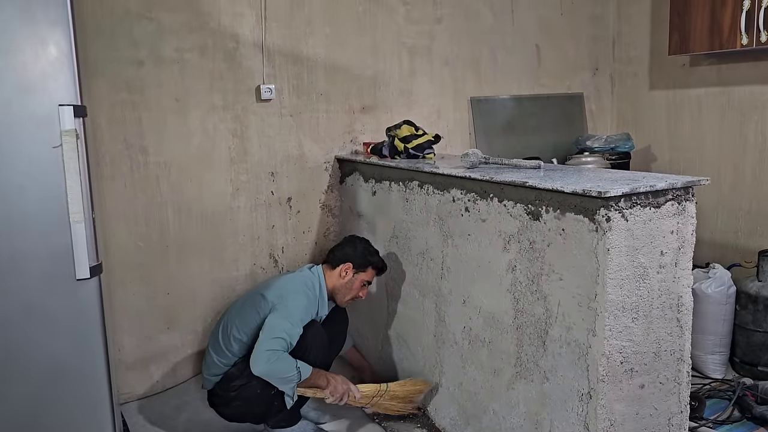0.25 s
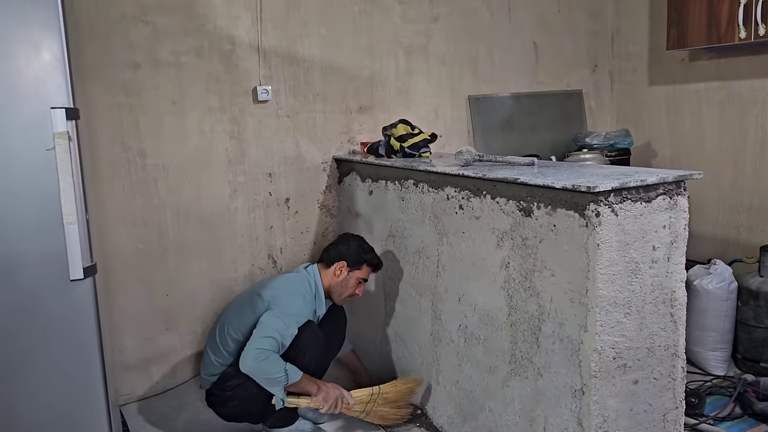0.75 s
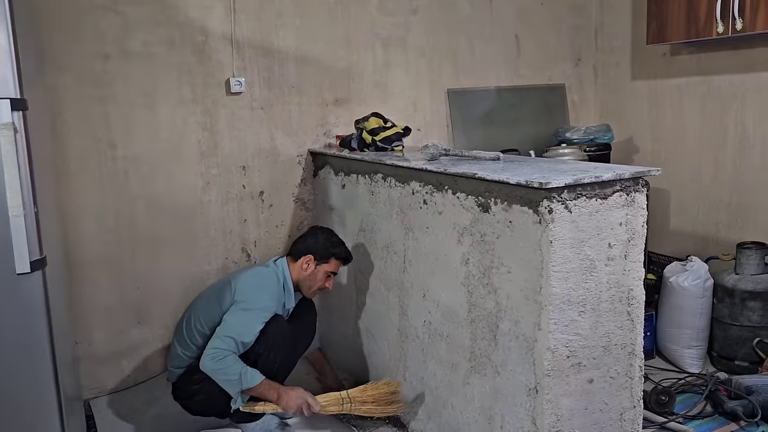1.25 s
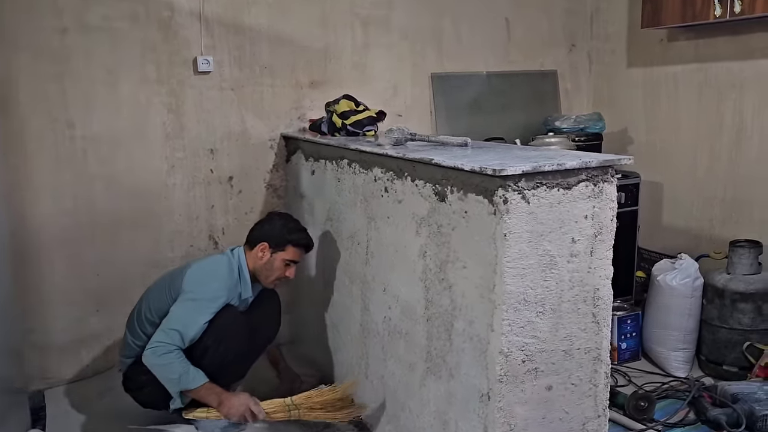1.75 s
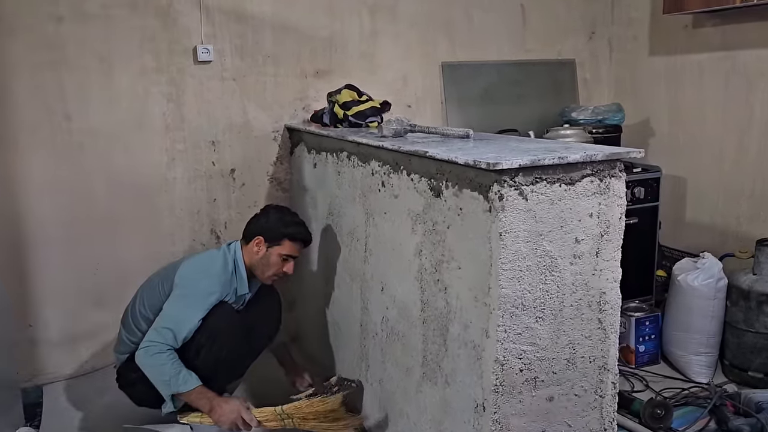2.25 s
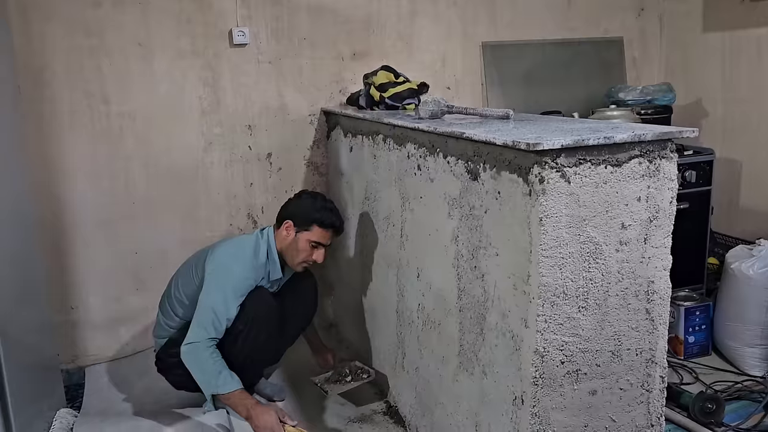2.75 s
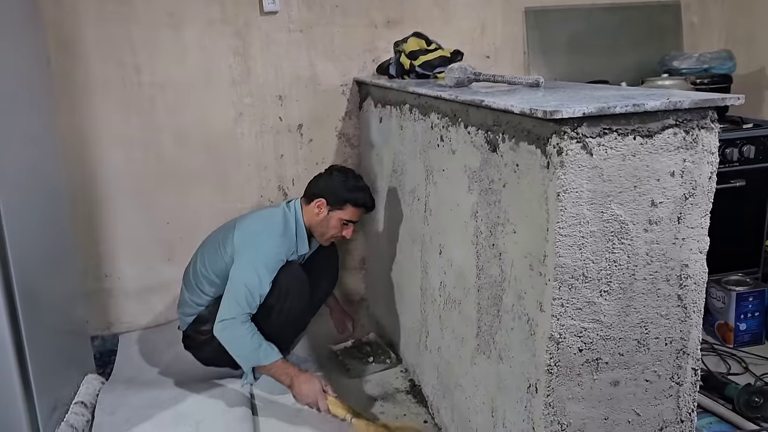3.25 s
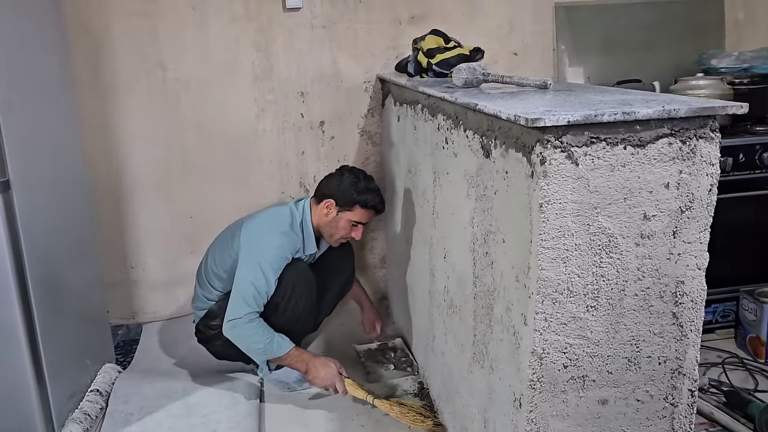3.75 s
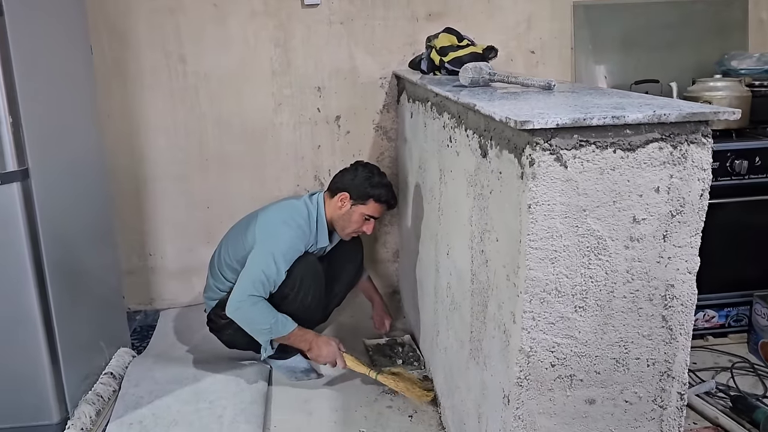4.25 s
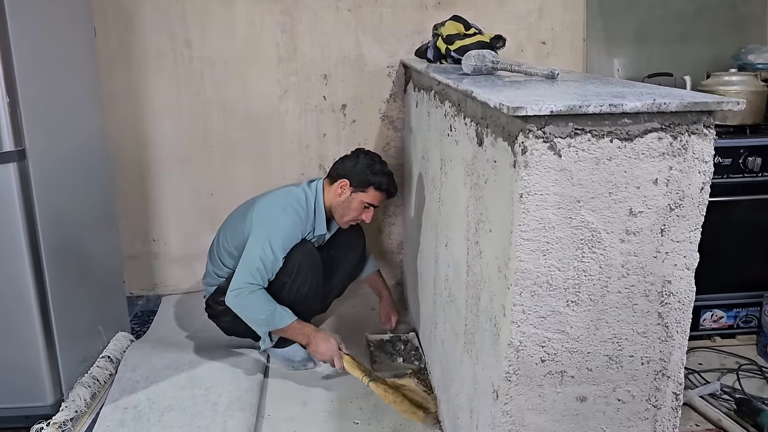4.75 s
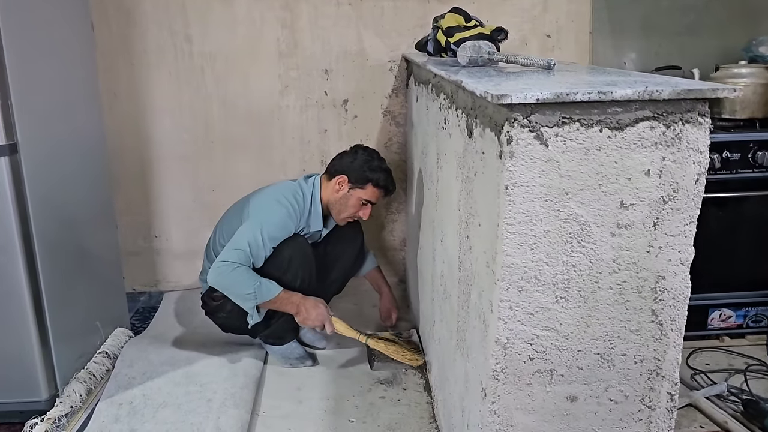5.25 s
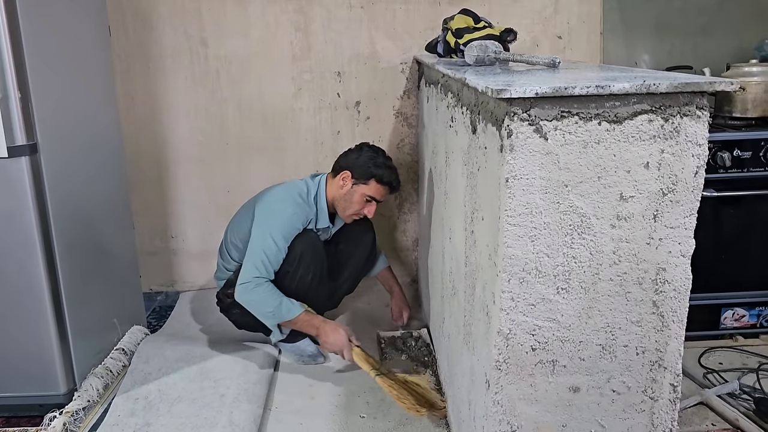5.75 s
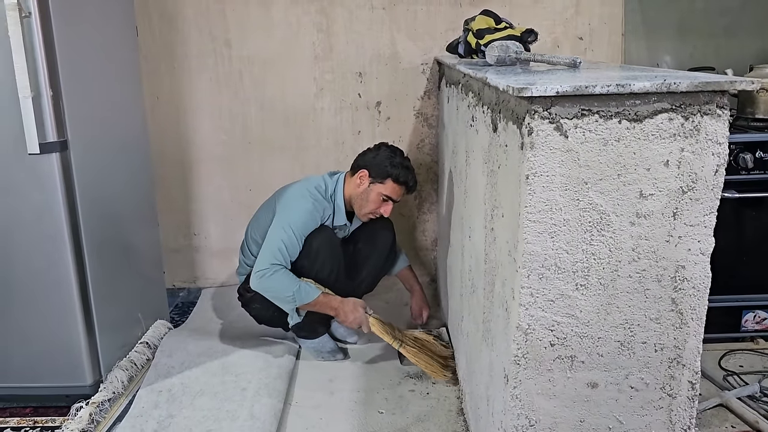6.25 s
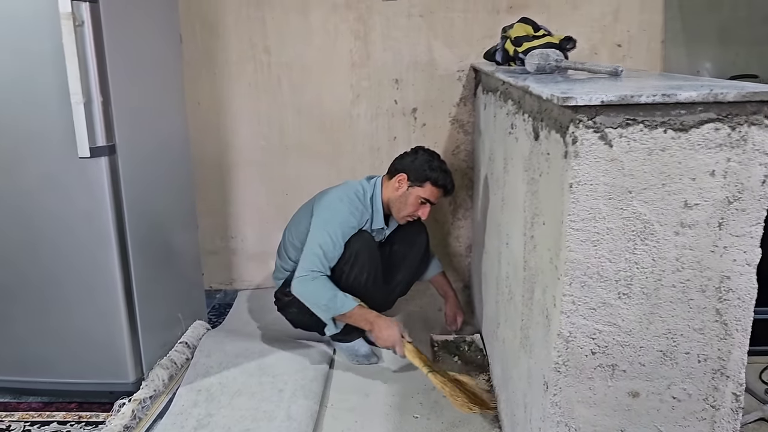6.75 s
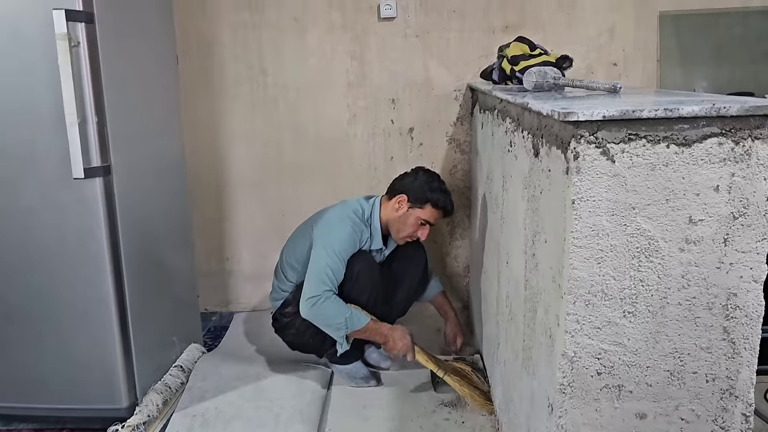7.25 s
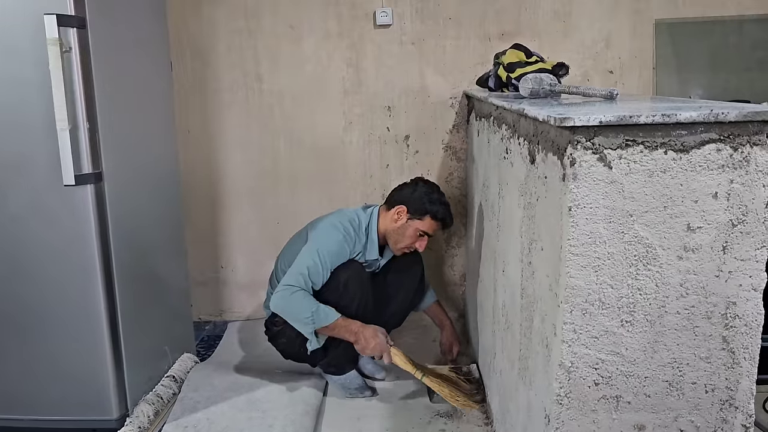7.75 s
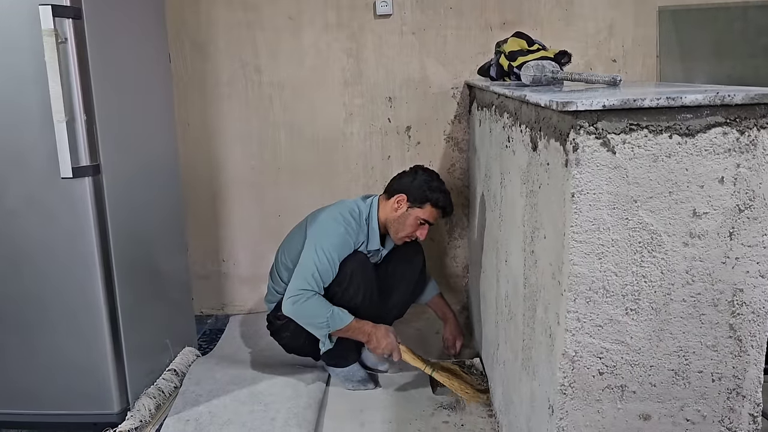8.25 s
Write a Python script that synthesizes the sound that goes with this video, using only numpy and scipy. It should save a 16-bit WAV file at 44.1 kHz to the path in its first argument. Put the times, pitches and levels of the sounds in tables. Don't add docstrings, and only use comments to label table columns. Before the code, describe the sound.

Close stereo pickup in a bare room with a short, hard echo. Almost silent at first; at 0.2 s a steel tool hits the floor with a sharp crack, bright high ringing and a dull thud, bounces, then lands again at about 0.45 s, with tiny ringing taps until 0.8. At 1.06 some grit and a stone knock the pan, leaving a brief blurred ring. From about 2.2 to 2.7 s strong straw broom strokes rasp over concrete, with dense hiss and many sharp stone ticks. Shorter strokes follow at 3.1 and 3.5. From 3.9 to 5.2 grit is brushed into the metal dustpan in heavy rasps with pings and low knocks. After 5.3 it quiets to light dusty flicks, peaking near 6, 6.9 and 8.1, with occasional taps and faint pan ring. Soft irregular low thumps hum through the walls throughout.

```python
import sys
import numpy as np
from scipy import signal
from scipy.fft import rfft, irfft, next_fast_len
from scipy.io import wavfile

SR = 44100
rng = np.random.default_rng(int(sys.argv[2]) if len(sys.argv) > 2 else 0)


def makeup_ratio(level_db):
    decades = np.asarray(level_db, float) / 20
    return 10 ** decades


def transcribe(u):
    v = np.clip(np.atleast_2d(u).T, -1, 1)
    q = np.round(v * 32767).astype(np.int16)
    wavfile.write(sys.argv[1], SR, q)


N = 375291

# (time [s], lead of the left port [samples], stones in the dust [dB])
BROOM_PLACE = [
    (0, 4, -2),
    (2.2, 1.45, -6.5),
    (2.3, 20.3, -2),
    (3, 20.6, -1.5),
    (3.1, 0.35, -6.5),
    (3.75, 0.92, -13.5),
    (3.85, 23.9, -4.5),
    (5.2, 23, -1),
    (5.3, 0.8, -0.5),
    (8.51, 1.3, -16),
]


def rms_one(x):
    return x / np.sqrt(np.mean(x ** 2) + 1e-20)


def in_time(rows):
    s, *columns = np.transpose(rows)
    return [np.interp(np.arange(N) / SR, s, column) for column in columns]


def at_hz(points, hz):
    points = np.array(points)
    return np.interp(np.log(hz + 1), np.log(points[:, 0]), points[:, 1])


def shaped(x, gain):
    size = next_fast_len(N)
    hz = np.arange(size // 2 + 1) * SR / size
    return irfft(rfft(x, size) * gain(hz), size)[..., :N]


def coloured(x, spectrum):
    return shaped(x, lambda hz: makeup_ratio(at_hz(spectrum, hz)))


def band(x, low_hz, high_hz):
    return signal.sosfilt(signal.butter(2, [low_hz, high_hz], "band", fs=SR, output="sos"), x)


def drift(rate_hz):
    r = np.exp(-2 * np.pi * rate_hz * 40 / SR)
    slow = signal.lfilter([1], [1, -2 * r, r * r], rng.standard_normal(N // 40 + 2002))[2000:]
    return np.interp(np.arange(N) / 40, np.arange(len(slow)), rms_one(slow - slow.mean()))


def swells(s, rise_s, hold_s, level_db, fade_db_per_s):
    t = np.arange(0, N + 64, 64)[:, None] / SR
    before_db = (s - t) * 20 / rise_s
    after_db = (t - s - hold_s) * fade_db_per_s
    db = level_db - np.maximum(0, np.maximum(before_db, after_db))
    total_db = 10 * np.log10(np.sum(makeup_ratio(db) ** 2, axis=1) + 1e-13)
    return np.interp(np.arange(N) / SR, t[:, 0], total_db)


def ring(clicks, hz, t60_s):
    r, w = makeup_ratio(-60 / (t60_s * SR)), 2 * np.pi * hz / SR
    return signal.lfilter([0, np.sin(w)], [1, -2 * r * np.cos(w), r * r], clicks + 1e-18)


def strike(times_s, levels_db, modes, uneven_db):
    twin_spread = 0.0035
    at = np.round(np.asarray(times_s) * SR).astype(int)
    out = np.zeros(N)
    span = slice(at[0], at[-1] + SR // 2)
    chance = rng.standard_normal((len(at), len(modes), 3))
    detune = 1 + twin_spread * rng.standard_normal((len(modes), 3)) * [0, 1, 1]
    sign = rng.choice([-1, 1], (len(modes), 3))
    for k, (hz, mode_db, t60_s) in enumerate(modes):
        for twin in range(3):
            clicks = np.zeros(span.stop)
            clicks[at] = makeup_ratio(levels_db + mode_db - 4.0 - 3.6 * twin + uneven_db * chance[:, k, twin])
            out[span] += sign[k, twin] * ring(clicks[span], hz * detune[k, twin], t60_s)
    return out


def bursts(rows, t60_s, octaves, snap=0):
    out, t = np.zeros(N + 4096), np.arange(4096) / SR
    for (s, peak_db, hz), noise in zip(rows, rng.standard_normal((len(rows), len(t)))):
        burst = noise * makeup_ratio(-60 * t / t60_s) - snap * (t == 0)
        burst = band(burst, hz / 2 ** octaves, min(hz * 2 ** octaves, 0.45 * SR))
        out[round(s * SR):][:len(t)] += makeup_ratio(peak_db) * burst / np.abs(burst).max()
    return out[:N]


def ports(x, lead):
    return np.array([x, np.interp(np.arange(N) - lead, np.arange(N), x)])


def scattered(pair):
    # (frequency [Hz], left-right likeness [-1..1])
    likeness = [(60, 1), (180, 0.85), (550, 0.49), (1650, -0.36), (4970, -0.41), (15000, -0.02)]
    sign = np.array([[1], [-1]])
    mid, side = shaped(pair, lambda hz: np.sqrt((1 + sign * np.clip(at_hz(likeness, hz), 0, 1)) / 2))
    return mid + sign * side


def broom():
    # (frequency [Hz], density [dB per Hz])
    straw = [(180, -26), (390, 13.5), (643, 14.5), (1570, 15), (2580, 13), (7450, 12), (10400, 9),
             (15700, 4.5)]
    # (frequency [Hz], width [Hz], lift [dB])
    pan_body = [(3880, 380, 1.5), (7600, 600, 2.5), (1500, 200, -0.5)]
    lead, stones_db = in_time(BROOM_PLACE)
    sizes = makeup_ratio(10.8 * np.minimum(rng.exponential(1, N), 3.7)) * rng.choice([-1, 1], N)
    grains_per_s = 2500 * makeup_ratio(5 * drift(15))
    grit = rms_one(sizes * (rng.random(N) < grains_per_s / SR))
    hiss = rng.standard_normal((3, N))
    near = 0.82 * grit * makeup_ratio(stones_db) + 0.34 * hiss[0]
    source = coloured(np.array([near, *scattered(hiss[1:])]), straw)

    def body_gain(hz):
        return makeup_ratio(sum(db / (1 + (2 * (hz - at) / width) ** 2) for at, width, db in pan_body))

    source = shaped(source, body_gain)
    shared, catching, out = drift(14.0), drift(55.0), 0
    for k, level_db in enumerate(pressure()):
        overlap = np.transpose([[1200, 2600, 4500, 8000], np.eye(3)[k][[0, 1, 1, 2]]])
        flicker_db = 1.0 * shared + 0.81 * drift(33) + 0.9 * catching
        part = rms_one(shaped(source, lambda hz: at_hz(overlap, hz)))
        out = out + part * makeup_ratio(level_db + flicker_db)
    return ports(out[0], lead) * makeup_ratio(-3.5) + out[1:] * makeup_ratio(-3.0), out[0]


def pressure():
    # (full pressure [s], swell [s], hold [s], hiss [dB], brightness [dB])
    sweeps = [(0.005, 0.21, 0.23, -68.5, -5), (1.83, 0.64, 0.62, -63.5, -3), (2.3, 0.21, 0.051, -54, -2.5),
              (2.396, 0.064, 0.068, -47.5, -1), (2.49, 0.11, 0.025, -46.5, -0.5),
              (2.644, 0.045, 0.009, -61, 0), (2.798, 0.23, 0.013, -58.5, -1), (3.167, 0.1, 0.21, -54, 4),
              (3.554, 0.43, 0.0058, -46.5, -3), (3.78, 0.17, 0.039, -59, 2.5),
              (3.993, 0.22, 0.031, -51, -1), (4.494, 0.44, 0.05, -48, -1.5), (4.72, 0.14, 0.23, -54, 0.5),
              (5.052, 0.12, 0.085, -59, 1), (6.3, 0.73, 0.062, -68.5, -3), (6.497, 0.44, 0.22, -79, -3),
              (5.6, 0.18, 0.13, -82.5, -9), (0.837, 0.05, 0.094, -71.5, -5.5), (7.9, 0.21, 0.08, -74, -1),
              (7.357, 0.42, 0.074, -67.5, 2), (8.325, 0.077, 0.23, -69.5, 0.5)]
    # (full pressure [s], swell [s], hold [s], hiss [dB], brightness [dB])
    flicks = [(5.43, 0.074, 0.013, -74, -5), (5.789, 0.063, 0.077, -59, 6.5), (5.98, 0.062, 0.11, -67.5, 7),
              (6.068, 0.15, 0.092, -58, 5), (6.8, 0.06, 0.063, -58, 6.5), (6.998, 0.07, 0.27, -58, 3.5),
              (7.654, 0.027, 0.017, -68.5, 1), (7.766, 0.021, 0.026, -71, 1), (8.037, 0.063, 0.1, -60.5, 7),
              (8.143, 0.077, 0.012, -56, 2.5)]
    # (time [s], hiss [dB], brightness [dB])
    scatters = [(0.01, -73.5, 13), (0.218, -36.5, -3), (0.337, -60.5, 17.5), (0.453, -51.5, 18),
                (0.521, -57, -3), (0.663, -60, 7), (0.796, -67.5, -0.5), (0.889, -63, -0.5),
                (1.058, -44.5, -1), (1.314, -60, -9.5), (1.614, -60, -5), (1.997, -78, -25),
                (2.173, -49, -10), (2.248, -54, -2), (3.09, -56, -2.5), (4.615, -44.5, -1.5),
                (4.996, -48.5, 1), (5.257, -58.5, -1.5), (6.959, -75, -4), (7.555, -69, -6)]
    # (share [dB], follows brightness [dB per dB], lag [s])
    debris = [
        (-2.5, -1.11, -0.0073),
        (2, 0.069, -0.0024),
        (2.5, 0.93, -0.00018),
    ]
    # (a sweep [dB/s], a flick [dB/s], a scatter [dB/s])
    fades = [
        (78.4, 64, 196),
        (82, 130, 153),
        (99, 150, 223),
    ]
    scatter_rise_s = 0.011
    thrown = [(s, scatter_rise_s, 0, db, bright) for s, db, bright in scatters]
    s, rise, hold, db, bright = np.transpose(sweeps + flicks + thrown)
    kind = np.repeat(range(3), [len(sweeps), len(flicks), len(scatters)])
    levels = []
    for (share_db, follow, lag), fade in zip(debris, fades):
        start = s + lag * (kind < 2)
        levels.append(swells(start, rise, hold, db + share_db + follow * bright, np.array(fade)[kind]))
    return levels


def stone_ticks():
    # (time [s], peak [dB], pitch [Hz])
    small_stones = [(0.7939, -39, 4130), (0.8999, -54, 5940), (1.056, -43, 4400), (1.6182, -46, 4560),
                    (1.733, -39, 6450), (2.1203, -32, 5530), (2.2202, -28, 4000), (2.228, -31, 7260),
                    (2.2374, -35, 4120), (2.2506, -28, 7100), (2.2894, -46, 7290), (2.324, -23, 5900),
                    (2.354, -45, 5160), (2.368, -27.5, 4380), (2.378, -23, 7900), (2.487, -32, 4100),
                    (2.4964, -30, 9260), (2.503, -26, 9000), (2.5295, -21, 7000), (2.6094, -32, 4000),
                    (2.6506, -33, 4870), (2.6554, -33, 4230), (2.7054, -39, 4380), (2.715, -28.5, 6700),
                    (2.9065, -39, 3600), (2.907, -47, 9000), (2.9716, -46, 9290), (3.028, -44, 9000),
                    (3.0395, -38, 8700), (3.0754, -46, 6450), (3.0954, -24, 9250), (3.4915, -45, 4200),
                    (3.5364, -43, 6900), (3.555, -36, 7230), (3.6348, -29.5, 6740),
                    (3.9105, -45, 3570), (3.9424, -31.5, 3880), (3.9774, -34, 3620), (4.187, -36, 8500),
               (4.226, -31.5, 8080), (4.2336, -36, 4100), (4.2753, -36, 3680), (4.313, -39, 3610),
               (4.349, -30, 7920), (4.36, -38, 3530), (4.3726, -33, 3630), (4.387, -25.5, 5940),
               (4.4232, -19.5, 4080), (4.501, -35, 4660), (4.5143, -21, 3900), (4.543, -23, 3720),
               (4.618, -21, 5350), (4.676, -24.5, 4450), (4.7247, -21, 9300), (4.998, -26, 3550),
               (5.026, -33, 3790), (5.0434, -33, 3520), (5.075, -32, 3560), (5.1444, -36, 7380),
               (5.2599, -45, 3610), (5.45, -49, 3640), (5.467, -50.5, 3780), (5.7324, -51, 4720),
               (5.77, -41, 5380), (5.9529, -43, 7890), (5.9723, -44, 7520), (6.212, -50, 5240),
               (6.77, -51, 7240), (6.782, -48, 4630), (7.5248, -38, 7450), (7.566, -53, 3600),
               (7.646, -53.5, 6290), (7.656, -49, 5940), (7.766, -49.5, 3230), (7.776, -47, 3000),
               (7.8054, -40.5, 7760), (7.808, -54, 3300), (7.9538, -51, 5390), (8.0022, -48, 7780),
               (8.0272, -34, 8270), (8.3216, -47, 3080), (8.484, -44, 5540)]
    # (time [s], peak [dB], pitch [Hz])
    grains = [(2.3084, -42, 7500), (2.3144, -37, 9170), (2.4184, -32, 8370), (2.4424, -36, 8420),
              (2.4554, -34, 8400), (2.5404, -39, 8280), (2.5894, -43, 9390), (2.6154, -45, 7530),
              (2.803, -47, 8530), (2.8314, -42, 7930), (3.1694, -42, 7870), (3.2994, -45, 7570),
              (3.4194, -40, 8030), (4.4514, -32, 8180), (4.4744, -39, 7680), (4.7344, -33, 9520),
              (4.8094, -38, 8990), (5.026, -32, 7760), (5.0444, -30, 7710), (5.0754, -38, 9420)]
    # (time [s], peak [dB], pitch [Hz])
    raps = [(1.504, -59.5, 1010), (1.531, -53, 930), (1.603, -51, 920), (1.623, -45, 1910),
            (2.005, -37.5, 1100), (2.098, -48, 1540), (2.176, -35, 990), (2.178, -35, 1770),
            (2.186, -33.5, 3000), (2.379, -42, 2000), (3.764, -46, 950), (3.832, -45, 940),
            (3.882, -45, 1700), (3.942, -56, 2670), (4.187, -48, 1430), (3.967, -32, 236),
            (4.001, -35, 242), (4.031, -32, 257), (4.109, -29, 235), (4.36, -42, 1620),
            (4.448, -32.5, 1540), (4.513, -42, 2040), (4.675, -33, 1080), (4.811, -42, 1250),
            (5.198, -47, 990), (5.2565, -34.5, 860), (5.267, -36, 900), (5.297, -50, 890),
            (5.864, -55, 880), (6.218, -45, 1980), (6.236, -42, 907), (6.958, -38, 2880), (6.958, -52, 700),
            (6.971, -54, 590), (6.978, -39, 2750), (6.977, -44, 480), (7.149, -49, 700),
            (8.319, -54.5, 1770), (7.71, -55, 1950), (7.807, -55, 2320), (7.457, -55, 600),
            (8.477, -61, 960)]
    ticks = bursts(small_stones + grains, t60_s=0.0056, octaves=0.88, snap=4.84)
    return ticks + bursts(raps, t60_s=0.0097, octaves=0.26, snap=60)


def dull_knocks():
    # (time [s], peak [dB], pitch [Hz])
    tool_knocks = [(0.217, -24, 324), (0.219, -25.5, 714), (0.228, -27, 920), (0.441, -29.5, 260),
                   (0.452, -32.5, 610), (0.487, -29.5, 690), (0.572, -29, 239), (0.65, -44.5, 330),
                   (0.862, -49.5, 330), (0.797, -45.5, 3623), (0.82, -51, 3800)]
    # (time [s], peak [dB], pitch [Hz])
    stone_knocks = [(1.057, -47, 1870), (1.069, -33, 1290), (1.064, -38, 3880), (1.08, -37, 4000),
                    (1.096, -44, 3800), (1.1, -40, 2000), (1.296, -52.5, 890), (1.531, -39, 310),
                    (1.602, -38, 310), (2.01, -44, 577), (2.18, -34.5, 1150), (2.04, -43, 470),
                    (2.115, -46, 497), (2.436, -36, 1300), (3.078, -43, 870), (3.96, -42, 306),
                    (4.105, -32, 185), (3.965, -33.5, 219), (4.032, -42, 211), (5.263, -50, 950),
                    (5.276, -65, 920), (5.39, -50, 890), (5.401, -52, 990), (5.869, -45.5, 790),
                    (6.126, -45, 1500), (6.135, -47, 970), (6.17, -47.5, 1600), (6.21, -46.5, 1430),
                    (6.244, -42.5, 910), (6.98, -47.5, 511), (7.242, -43, 1000), (7.26, -40, 1080),
                    (7.456, -49, 297), (7.564, -52.5, 2500), (8.129, -67, 1040), ]
    return bursts(tool_knocks + stone_knocks, t60_s=0.066, octaves=0.61)


def pan():
    # (time [s], level [dB], pitch [Hz], swell [s], t60 [s])
    pan_ring = [(1.1, -44.5, 1290, 0.036, 0.31), (1.06, -48.5, 3800, 0.019, 0.27),
                (1.075, -49, 4490, 0.015, 0.16), (1.3, -65, 2250, 0.041, 1.52), (6.24, -70, 2930, .06, 1.6),
                (6.54, -79, 2900, .3, 0.26), (6.501, -71.5, 2100, 0.28, .3), (7.71, -73, 1900, 0.03, 0.3),
                (7.94, -72, 2160, 0.18, 0.6), (7.82, -72.5, 1900, 0.1, 1.8), (7.25, -57, 1060, 0.012, 0.3),
                (8.14, -60, 1030, 0.04, 0.7), (8.34, -74, 1863, 0.028, 0.81)]
    rub, out = rng.standard_normal(N), 0
    for s, db, hz, rise_s, t60_s in pan_ring:
        out = out + rms_one(ring(rub, hz, 0.055)) * makeup_ratio(swells(s, rise_s, 0, db, 60 / t60_s))
    return out


def clatter():
    # (time [s], crack peak [dB], ring [dB], thud [dB])
    first_fall = [
        (0.214, -32.5, -29, -41.5),
        (0.2188, -10.5, -22, -16.5),
        (0.228, -29, -43, -22),
        (0.2352, -31, -19.5, -22.5),
        (0.262, -37, -37.5, -22),
        (0.2994, -44, -26, -26),
    ]
    second_fall = [
        (0.4419, -50, -59, -28.5),
        (0.4538, -22.5, -24.5, -28),
        (0.4595, -19, -21.5, -37),
        (0.49, -35, -22.5, -55),
        (0.5062, -51.5, -40, -32.5),
        (0.5746, -38, -45, -47),
    ]
    last_bounce = [
        (0.6194, -55, -61, -72),
        (0.662, -56, -40, -64),
        (0.686, -62, -44, -66),
        (0.7941, -64, -78, -70),
    ]
    steel_hz = [2191, 4926, 5884, 7610, 8200, 8683, 10020, 11060, 11540, 12760, 12900, 13190, 15190, 15600]
    # (level [dB], t60 [s])
    first_ring = [(-29.5, 0.139), (-26.5, 0.15), (-27.5, .4), (-19, .2), (-14.5, 0.16), (-21, 0.217),
                  (-10, 0.1215), (-21, 0.19), (-21.5, 0.3), (-17.5, 0.17), (-7, 0.43), (-20.5, 0.148),
                  (-9, .3), (-13.5, 0.34)]
    second_ring = [(-30.5, 0.37), (-36, 0.15), (-12, 0.28), (-24, .1), (-17, 0.3), (-16, 0.28),
                   (-15.5, 0.36), (-17, 0.22), (-6.5, 0.19), (-8, 0.15), (-15, 0.12), (-22, .1),
                   (-11, 0.31), (-8, 0.23)]
    last_ring = [(-42, .2), (-20, 0.4), (-32.5, .3), (-37, 0.16), (-34, .2), (-11, 0.24), (-33, .2),
                 (-30, .2), (2.5, 0.18), (-24, .2), (-30, .2), (-6, .15), (-12, 0.28), (-30, .3)]
    # (frequency [Hz], level [dB], t60 [s])
    earlier_ring = [(12760, -50.5, 0.222), (15400, -50.5, 0.14)]
    # (frequency [Hz], level [dB], t60 [s])
    floor_thud = [(148.4, -9.5, 0.57), (211, -3, 0.21), (230, -3, 0.12), (276, 0, 0.37), (400, -2, 0.1)]
    settles_s = [
        0.44,
        0.61,
        0.705,
    ]
    settle_db_per_s, rattle_db = 246, 0
    crack, thud = 0, 0
    steel = strike([0], np.zeros(1), earlier_ring, uneven_db=1.5)
    falls = [(first_fall, first_ring), (second_fall, second_ring), (last_bounce, last_ring)]
    for (fall, face), settle_s in zip(falls, settles_s):
        choke_db = -settle_db_per_s * np.clip(np.arange(N) / SR - settle_s, 0, 0.1)
        s, crack_db, ring_db, thud_db = np.transpose(fall)
        modes = [(hz, db, t60_s) for hz, (db, t60_s) in zip(steel_hz, face)]
        crack = crack + bursts(np.transpose([s, crack_db, 9000 + 0 * s]), t60_s=0.017, octaves=0.71)
        steel = steel + np.array([strike(s, ring_db, modes, uneven_db=2.5)
                                  * makeup_ratio(choke_db + rattle_db * drift(70.0)) for port in range(2)])
        thud = thud + strike(s, thud_db, floor_thud, uneven_db=3.0)
    return crack, makeup_ratio(-4.5) * steel, makeup_ratio(-3.5) * band(thud, 93, 1500)


def thumping():
    # (time [s], held [s], boom [dB])
    thumps = [(0.233, 0.0083, -24), (0.45, 0.33, -49), (0.855, 0.0058, -41.5), (1.828, 0.04, -43),
              (2.005, 0.019, -43), (2.554, 0.032, -45.5), (2.803, 0.041, -44.5), (3.025, 0.043, -45),
              (3.929, 0.1, -41), (4.105, 0.032, -41), (4.168, 0.0025, -39), (4.568, 0.037, -46.5),
              (4.839, 0.0068, -42), (4.921, 0.035, -42.5), (5.034, 0.06, -44.5), (5.468, 0.057, -45),
              (5.772, 0.032, -44.5), (5.854, 0.042, -41.5), (6.075, 0.09, -42.5), (6.416, 0.052, -44),
              (6.658, 0.049, -44.5), (6.945, 0.039, -42.5), (7.237, 0.041, -44), (7.469, 0.041, -43),
              (7.758, 0.0055, -45.5), (7.993, 0.037, -44.5), (8.284, 0.017, -39),
              (0.011, 0.17, -51), (1.04, 0.12, -50), (1.189, 0.042, -51), (1.348, 0.026, -46.5),
            (1.535, 0.089, -48), (1.635, 0.11, -50), (2.231, 0.037, -45.5), (2.359, 0.076, -48.5),
            (2.904, 0.0034, -48.5), (3.122, 0.24, -48.5), (3.262, 0.078, -46.5), (3.483, 0.15, -46),
            (3.664, 0.027, -44.5), (3.749, 0.17, -48), (4.358, 0.12, -46), (4.669, 0.061, -46.5),
            (5.305, 0.07, -49), (5.6, 0.1, -48), (6.182, 0.1, -48), (6.325, 0.013, -46.5),
            (7.114, 0.043, -55.5), (7.369, 0.093, -54), (7.596, 0.054, -48), (7.872, 0.0018, -46),
            (8.182, 0.035, -47.5), (8.385, 0.14, -49.5)]
    # (frequency [Hz], width [Hz], level [dB])
    boom = [(144.4, 14.5, -0.5), (175.3, 31, -1.5), (211.3, 58, -2.5), (249.4, 37, -3), (291, 37.5, -9)]
    deep = [(46.7, 41, -16.5), (82.1, 14.6, -8.5)]
    rise_s, between_db = 0.024, -57.5
    s, hold, db = np.transpose([(0.0068, N / SR, between_db)] + thumps)
    boom_db = swells(s, rise_s, hold, db, 225)
    deep_db, deep_offset_db, deep_swing = swells(s, 2 * rise_s, hold, db, 134), -10, 1
    deep_db = deep_offset_db + deep_db.mean() + deep_swing * (deep_db - deep_db.mean())
    blows, layers = rng.standard_normal((2, N)), []
    for modes, level_db in [(boom, boom_db), (deep, deep_db)]:
        hum = 0
        for k, (hz, width_hz, mode_db) in enumerate(modes):
            hum = hum + makeup_ratio(mode_db) * rms_one(ring(blows, hz, 3.43 / width_hz)) * (-1) ** k
        layers.append(rms_one(band(hum, 40.3, 355)) * makeup_ratio(level_db))
    mid, side = sum(layers)
    return mid + makeup_ratio(-19) * side * [[1], [-1]]


def room(x):
    # (frequency [Hz], t60 [s])
    room_t60 = [(100, 0.44), (500, 0.28), (2000, 0.28), (6000, 0.13), (14000, 0.04)]
    t, tail = np.arange(SR // 2) / SR, 0
    for hz in 90 * 2.0 ** np.arange(8):
        decay = makeup_ratio(-60 * t / at_hz(room_t60, hz)) * np.minimum(t / 0.00053, 1)
        tail = tail + band(rng.standard_normal((2, len(t))), hz / np.sqrt(2), hz * np.sqrt(2)) * decay
    tail = tail / np.sqrt(np.sum(tail ** 2) / 2)
    return signal.fftconvolve(x[None], tail, axes=1)[:, :N]


def background():
    # (frequency [Hz], level [dB])
    air_spectrum = [(300, -4.5), (622, -5.5), (1190, -19.5), (2080, -15.5), (2580, -27), (6750, -35),
                    (7450, -20.5), (15700, -74.5)]
    air_db, sway_db = -63.5, 1.2
    air = coloured(scattered(rng.standard_normal((2, N))), air_spectrum)
    return rms_one(air) * makeup_ratio(air_db + sway_db * drift(2.0))


def scene():
    sweep, sweep_dry = broom()
    crack, steel, thud = clatter()
    knocks, ticks = dull_knocks(), stone_ticks()
    near = ports(knocks + pan(), 0.54) * makeup_ratio(0.5) + ports(ticks, in_time(BROOM_PLACE)[0]) * makeup_ratio(0.5)
    near = near + ports(crack, 10) + steel + thud
    to_room = makeup_ratio(-3.5) * knocks + makeup_ratio(-4.5) * ticks + makeup_ratio(1.0) * crack
    to_room = to_room + makeup_ratio(5.0) * steel[0] + makeup_ratio(-13.0) * thud + makeup_ratio(-6.0) * sweep_dry
    return sweep + near + scattered(room(to_room)) + thumping() + background()


def low_pass(x):
    return signal.sosfilt(signal.butter(12, 16650, fs=SR, output="sos"), x)


def record(dry):
    # (frequency [Hz], left minus right [dB])
    left_lean = [(60, -2), (240, 2.5), (950, 2.5), (3770, 2.5), (15000, 4)]
    sign = np.array([[1], [-1]])
    lean = shaped(dry, lambda hz: makeup_ratio(at_hz(left_lean, hz) / 2 * sign))
    cut = signal.sosfilt(signal.butter(2, 40, "high", fs=SR, output="sos"), lean)
    cut = signal.sosfilt(signal.ellip(12, 0.5, 70, 15800, fs=SR, output="sos"), cut)
    return low_pass(cut)


dry = scene()
out = record(dry)
transcribe(out)
```